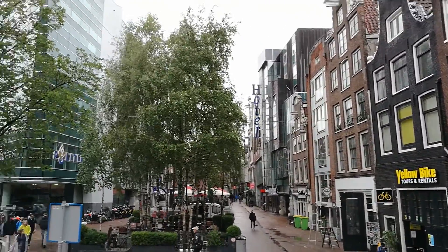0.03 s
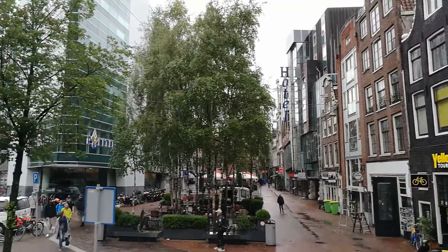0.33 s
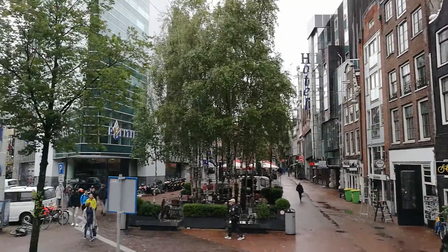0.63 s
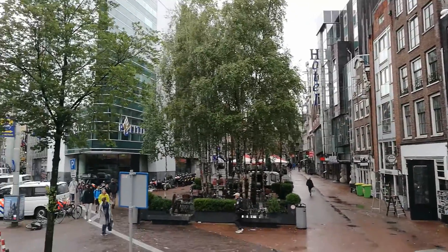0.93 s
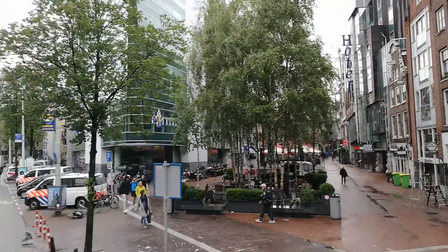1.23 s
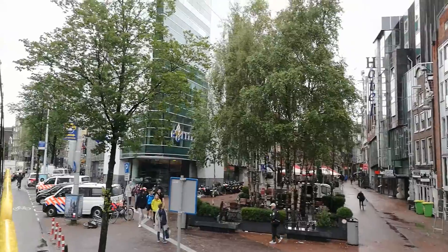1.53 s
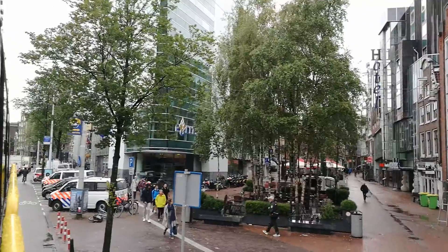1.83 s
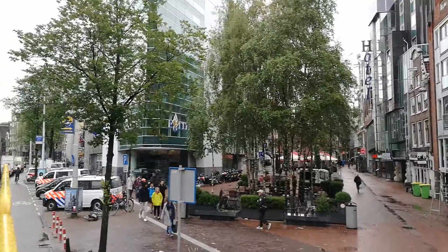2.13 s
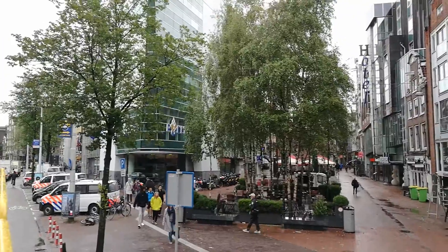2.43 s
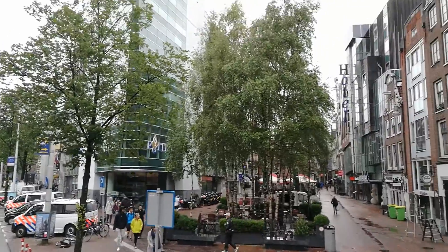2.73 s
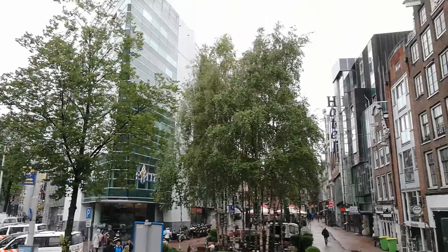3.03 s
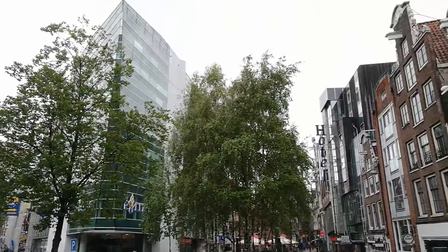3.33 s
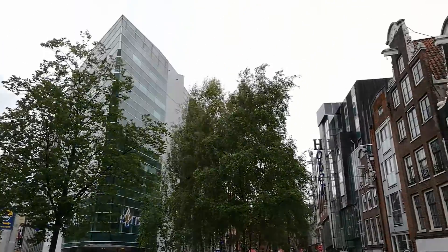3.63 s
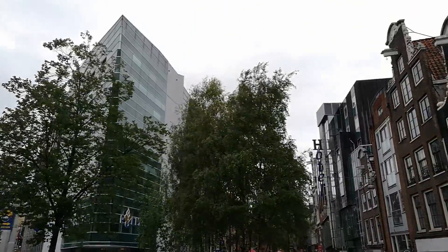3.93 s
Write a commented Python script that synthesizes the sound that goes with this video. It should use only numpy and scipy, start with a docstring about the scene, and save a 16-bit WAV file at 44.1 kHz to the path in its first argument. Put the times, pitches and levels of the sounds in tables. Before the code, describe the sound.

Gusts of wind rumble and slap right on the microphone, building from near quiet and coming in waves. Farther off, traffic roars on wet town streets and compressed air briefly hisses, while the bus carrying the microphone drones underneath.

```python
"""Wet town streets, from the open deck of a rolling bus. Right at the microphone, gusts carry eddies
that rumble, flutter and now and then slap its port. Farther off, traffic roars, wet tyres hiss and
compressed air is let off with a thin falling whistle; the bus drones underneath.
The left channel hears it all slightly late and dull."""
import sys
import numpy as np
from scipy import signal
from scipy.fft import rfft, irfft
from scipy.io import wavfile
from scipy.ndimage import uniform_filter1d, map_coordinates

SR = 44100
rng = np.random.default_rng(int(sys.argv[2]) if len(sys.argv) > 2 else 0)


def wav_record(signal):
    """Record a signal, one row per channel, as 16-bit PCM in the file named by sys.argv[1]."""
    frames = np.transpose(np.atleast_2d(signal))
    bounded = np.clip(frames, -1, 1)
    # unit amplitude maps onto the largest positive 16-bit level
    quanta = np.round(bounded * 32767).astype(np.int16)
    wavfile.write(sys.argv[1], SR, quanta)


N = 176400


def wind_buffeting(t):
    """Eddies sweep past the microphone port: the faster the air, the quicker the pressure swings."""
    # airflow between the gusts: t/s, level/dB
    breeze = [(0, -66), (.2, -73.5), (.45, -66), (.7, -54.5), (1.0, -49), (1.5, -50), (1.62, -38),
              (2.0, -39), (2.25, -42), (2.55, -47), (2.7, -39), (3.15, -37.5), (3.3, -45.5), (3.5, -42),
              (3.7, -37), (4, -32.5)]
    # gusts on the microphone: start/s, length/s, level/dB, eddy rate/Hz
    gusts = [(.765, 0.039, -37.5, 129), (1.055, 0.021, -31.5, 140), (1.109, 0.0096, -36.5, 140.7),
             (1.556, 0.012, -23, 189.4), (1.639, .03, -26, 281.2), (1.674, 0.083, -20, 233.8),
             (1.788, .05, -23, 241.8), (1.86, 0.011, -23, 280), (1.924, .035, -23.5, 209.3),
             (2.009, 0.033, -29.5, 145.2), (2.05, 0.029, -35.5, 222.6), (2.133, 0.038, -27, 168.4),
             (2.185, 0.014, -31.5, 218.8), (2.295, 0.0399, -25.5, 255.7), (2.343, 0.081, -29.5, 234.4),
             (2.446, .02, -32, 309.6), (2.621, 0.022, -29.5, 280.2), (2.704, 0.032, -28, 401.1),
             (2.768, 0.019, -24.5, 298.5), (2.834, 0.031, -25, 319.6), (2.89, .11, -27, 239.7),
             (3.027, 0.058, -32, 216), (3.155, .035, -34, 200.1), (3.28, 0.015, -35, 120.2),
             (3.337, 0.037, -36, 124.8), (3.433, 0.016, -30.5, 110.7), (3.522, 0.011, -33, 230.1),
             (3.563, 0.036, -25, 199.7), (3.62, 0.044, -28, 265.7), (3.686, 0.037, -23, 206),
             (3.747, 0.031, -21.5, 220.9), (3.801, 0.038, -23.5, 272.1), (3.861, 0.069, -25, 298.3),
             (3.97, 0.037, -24.5, 199.5)]
    # pressure spectrum of eddies passing at the rate reference_hz: f/Hz, level/dB
    eddy_spectrum = [(20, -6.5), (60, -3), (115, 1), (190, -2), (300, -3.5), (500, -11.5), (1000, -24),
                     (2000, -45.5), (5000, -78)]
    # the port's response to wind: f/Hz, gain/dB
    port = [(10, -14), (30, -4.5), (70, 1.5), (700, 3.5), (1200, 0.5), (2000, 3), (4000, -17), (12000, -8)]
    rise_s, fall_s = .004, .008
    breeze_hz, reference_hz, db_per_octave = 124.5, 250, 10.5
    power = undb(curve(breeze)) ** 2
    weighted_hz = power * breeze_hz
    for start, length, db, hz in gusts:
        onset = np.minimum(t - start, 0) / rise_s
        tail = np.maximum(t - start - length, 0) / fall_s
        gust_power = (undb(db) * np.exp(onset - tail)) ** 2
        power += gust_power
        weighted_hz += gust_power * hz
    surge_db = 4 * np.tanh(wander(rate=202.6))  # turbulence
    speed = weighted_hz / power / reference_hz * 2 ** (surge_db / db_per_octave)
    position = np.cumsum(speed) % (N - 1)
    pressure_field = noise(response(eddy_spectrum))
    eddies = map_coordinates(pressure_field, [position], order=3, mode="wrap") * undb(surge_db)
    local_power = uniform_filter1d(uniform_filter1d(eddies ** 2, size=800), size=500)
    eddies /= np.sqrt(local_power + 1e-9)  # evened out, so breeze and gusts set the level
    edge_fade = np.clip(np.minimum(t, t[-1] - t) / .004, 0, 1)
    return irfft(rfft(eddies * np.sqrt(power) * edge_fade) * response(port), N)


def wind_slaps(t):
    """Small fast eddies hit the microphone for a few milliseconds; the port dulls their edge."""
    # hits on the port: t/s, level/dB, fall time/s
    slaps = [(1.564, -23.5, 0.0011), (1.651, -30, 0.0039), (1.707, -24, 0.00093), (1.716, -21.5, 0.0032),
             (1.752, -14.5, 0.00062), (1.766, -13, .003), (1.821, -19, .002), (1.838, -19.5, 0.0011),
             (1.86, -39, 0.0011), (1.949, -19.5, 0.0013), (2.299, -28, 0.0033), (2.627, -30, 0.0019),
             (2.708, -15.5, 0.0017), (2.716, -24.5, 0.0031), (2.77, -26, 0.0016), (2.832, -48, 0.0022),
             (2.891, -29.5, .002), (2.959, -29.5, 0.0039), (2.988, -29, 0.0041), (3.057, -33.5, 0.0029),
             (3.16, -33.5, 0.0018), (3.524, -33, .002), (3.563, -36, .002), (3.59, -24, 0.0014),
             (3.621, -35, 0.0023), (3.661, -24, 0.0016), (3.709, -17, 0.0019), (3.749, -21, 0.0049),
             (3.754, -12.5, .0015), (3.802, -23.5, 0.0014), (3.859, -27, 0.0029), (3.879, -23.5, 0.0019),
             (3.914, -28.5, 0.0019)]
    # pressure spectrum of a slap: f/Hz, level/dB
    slap_spectrum = [(50, 7.5), (250, 3.5), (600, 8), (1150, 0), (1600, -9.5), (2400, -16.5), (3600, -25.5),
                     (8000, -55)]
    rise_s, cutoff_hz = .00073, 2770
    pressure, out = noise(response(slap_spectrum)), np.zeros(N)
    for at, db, fall_s in slaps:
        near = abs(t - at) < .03
        age = t[near] - at
        envelope = 2 / (np.exp(-age / rise_s) + np.exp(age / fall_s))
        out[near] += undb(db) * unit_rms(pressure[near] * envelope) * np.sqrt(np.mean(envelope ** 2))
    return irfft(rfft(out) / (1 + (freqs() / cutoff_hz) ** 4), N)


def traffic():
    """Out in the street, traffic roars and tyres hiss and throw spray off wet paving, all swelling in."""
    # spectra of the roar, the tyre hiss and the fine spray: f/Hz, level/dB
    roar_spectrum = [(100, -11.5), (250, 1), (420, -6.5), (600, -6), (780, -2), (930, -4), (1250, -6.5),
                     (1600, -7.5), (1900, -11.5), (2300, -11.5), (2700, -18), (4000, -25), (9000, -52)]
    tyre_spectrum = [(1200, -27), (2500, -2), (3300, 1), (4000, -0.5), (4900, -0.5), (6000, -3),
                     (7500, -10), (11000, -11), (16000, -32)]
    spray_spectrum = [(5000, -25), (7500, -6), (8800, -4), (9700, 0), (11000, -13), (13000, -16.5),
                      (16000, -27)]
    # street levels: t/s, roar/dB, tyres/dB, spray/dB
    levels = [(0, -67.5, -77.5, -86), (.3, -65, -78, -87), (.6, -61.5, -73.5, -81), (.8, -55.5, -68, -72.5),
              (1.05, -51, -60, -73), (1.5, -47, -55.5, -72), (2.0, -51, -55.5, -61.5),
              (2.5, -50.5, -58, -65), (3.0, -50, -57.5, -69.5), (3.45, -50, -57.5, -67),
              (3.75, -49, -57, -61), (4, -47, -57, -63)]
    roar = wavering_noise(roar_spectrum, flicker_db=.5, rate=19) * undb(curve(levels, column=1))
    tyres = wavering_noise(tyre_spectrum, flicker_db=1.37, rate=12) * undb(curve(levels, column=2))
    spray = wavering_noise(spray_spectrum, flicker_db=.7, rate=12) * undb(curve(levels, column=3))
    return roar + tyres + spray


def compressed_air(t):
    """Each release opens quickly and dies with the pressure; a breathy whistle sinks as it empties."""
    # air let off: t/s, level/dB, centre/Hz, width/Hz, decay/(dB per s)
    releases = [(.71, -67, 9210, 1810, 74), (1.322, -47.5, 10000, 5770, 18.5),
                (1.324, -67, 14200, 4500, 45), (1.515, -51, 5460, 7200, 22), (3.595, -69, 12740, 3007, 55)]
    # whistle of the escaping air: t/s, f/Hz, level/dB
    whistle_path = [(1.45, 8430, -80), (1.56, 8206, -60), (1.68, 8070, -62), (1.8, 7980, -57.5),
                    (1.97, 7850, -58), (2.08, 7413, -65), (2.18, 6870, -65.5), (2.31, 6583, -59.5),
                    (2.5, 6546, -83)]
    rise_s, whistle_width_hz = .016, 220
    hiss = np.zeros(N)
    for at, db, hz, width, decay in releases:
        age = np.maximum(t - at, 0)
        hiss += noise_band(hz, width) * np.minimum(age / rise_s, 1) * undb(db - decay * age)
    phase = 2 * np.pi * np.cumsum(curve(whistle_path)) / SR
    skirt = 1 / (1 + (freqs() / whistle_width_hz) ** 2)
    whistle = noise(skirt) * np.cos(phase) + noise(skirt) * np.sin(phase)
    sounding = (t > whistle_path[0][0]) & (t < whistle_path[-1][0])
    return hiss + whistle * sounding * undb(curve(whistle_path, column=2))


def bus():
    """The bus drones under the deck, with a faint, narrow sizzle high above."""
    # spectrum of the low drone: f/Hz, level/dB
    drone_spectrum = [(30, 18), (65, 2.5), (110, 8.5), (170, -9), (240, -10.5), (295, -0.5), (360, -15),
                      (700, -47)]
    # swell of the drone and of the sizzle: t/s, level/dB
    drone_levels = [(0, -64), (.4, -69.5), (.7, -51.5), (1.05, -47.5), (1.5, -44), (2.5, -47), (4, -53)]
    sizzle_levels = [(0, -101), (.4, -85), (.62, -73.5), (1.05, -63), (1.35, -68), (1.8, -76), (4, -68)]
    drone = wavering_noise(drone_spectrum, flicker_db=7.5, rate=20) * undb(curve(drone_levels))
    sizzle = noise_band(hz=4590, width_hz=870) * undb(curve(sizzle_levels))
    return drone + sizzle


def with_reflections(direct):
    """The sides of the bus and the house fronts throw sound back; overall power stays about the same."""
    # reflections at the microphone: delay/s, level/dB
    reflections = [(.0042, -20.5), (0.0112, -16), (.027, -19.5), (.061, -14)]
    reflected = sum(undb(db) * delayed(direct, seconds) for seconds, db in reflections)
    power_gain = 1 + sum(undb(db) ** 2 for _, db in reflections)
    return (direct + reflected) / np.sqrt(power_gain)


def undb(db):
    return 10 ** (np.asarray(db) / 20)


def unit_rms(x):
    return x / np.sqrt(np.mean(x ** 2) + 1e-20)


def delayed(x, seconds):
    return map_coordinates(x, [np.arange(N) - seconds * SR], order=3, mode="mirror")


def curve(rows, column=1):
    """One column of a table, joined by straight lines in time."""
    rows = np.array(rows)
    return np.interp(np.arange(N) / SR, rows[:, 0], rows[:, column])


def freqs():
    return np.maximum(np.arange(N // 2 + 1) * SR / N, 1)


def response(points):
    """Gain at every frequency from points of f/Hz, level/dB."""
    hz, db = np.array(points).T
    return undb(np.interp(np.log(freqs()), np.log(hz), db))


def noise(gain):
    """Noise of rms 1, shaped by a gain per frequency."""
    return unit_rms(irfft(rfft(rng.standard_normal(N)) * gain, N))


def noise_band(hz, width_hz):
    """Noise through one resonance, applied twice."""
    return noise(1 / (1 + ((freqs() - hz ** 2 / freqs()) / width_hz) ** 2))


def wander(rate):
    """A smooth random curve of rms 1 that changes about rate times a second."""
    return noise(np.exp(-(freqs() / rate) ** 2))


def wavering_noise(spectrum, flicker_db, rate):
    """Noise whose octave bands each waver on their own."""
    source = rfft(noise(response(spectrum)))
    octave = np.log2(freqs() / 50)
    bands = (irfft(source * np.maximum(1 - abs(octave - k), 0), N) for k in range(10))
    return unit_rms(sum(band * undb(flicker_db * np.tanh(wander(rate))) for band in bands))


def scene():
    """Wind right on the microphone, the rest with its reflections; the left channel is late and dull."""
    left_cutoff_hz, left_lag_s = 310, .00054
    t = np.arange(N) / SR
    surroundings = with_reflections(traffic() + bus() + compressed_air(t))
    right = wind_buffeting(t) + wind_slaps(t) + surroundings
    pole = np.exp(-2 * np.pi * left_cutoff_hz / SR)
    left = signal.lfilter([1 - pole], [1, -pole], delayed(right, left_lag_s))
    return np.array([left, right])


def record(dry):
    """The recorder cuts the top treble steeply."""
    cutoff_hz = 15700
    return signal.sosfilt(signal.ellip(10, .1, 80, cutoff_hz, fs=SR, output="sos"), dry)


dry = scene()
out = record(dry)
wav_record(out)
```